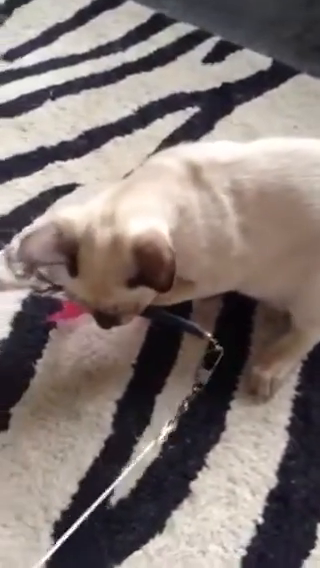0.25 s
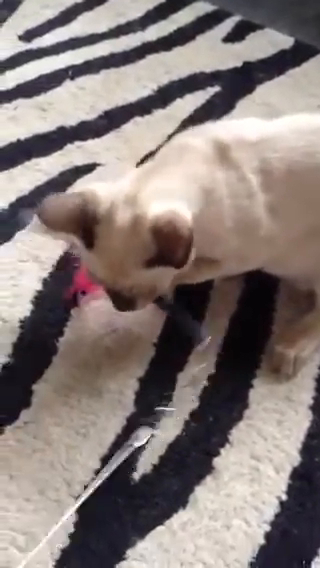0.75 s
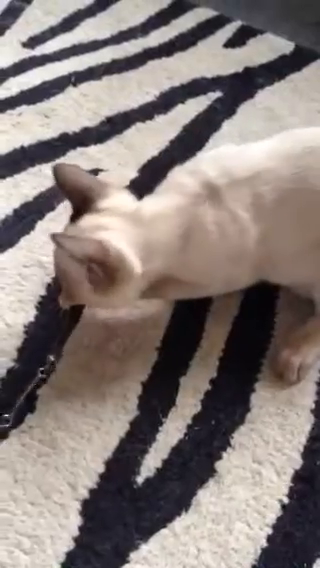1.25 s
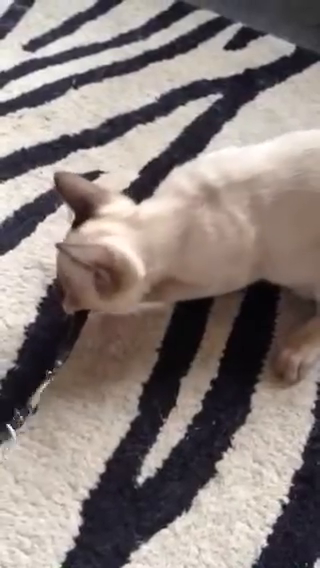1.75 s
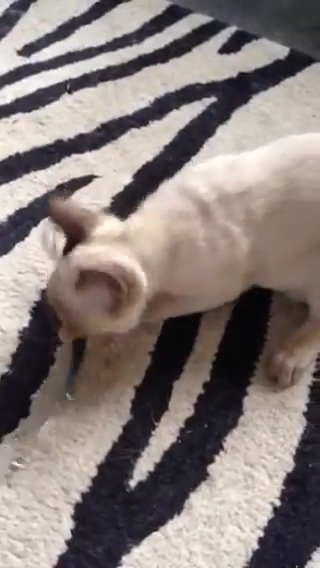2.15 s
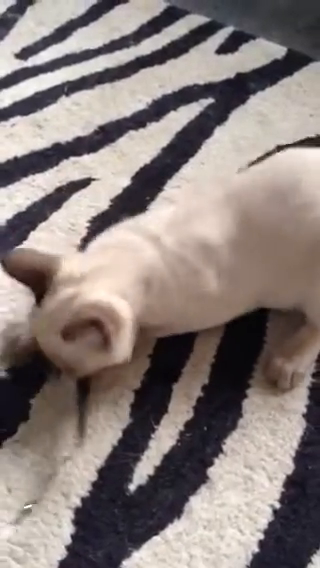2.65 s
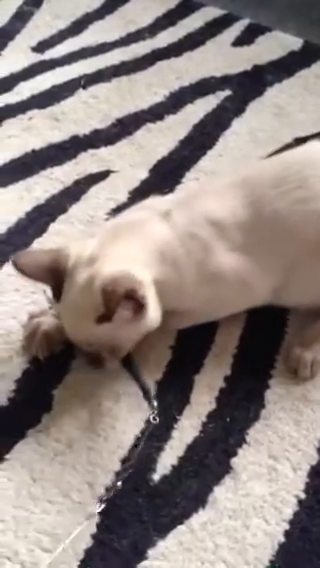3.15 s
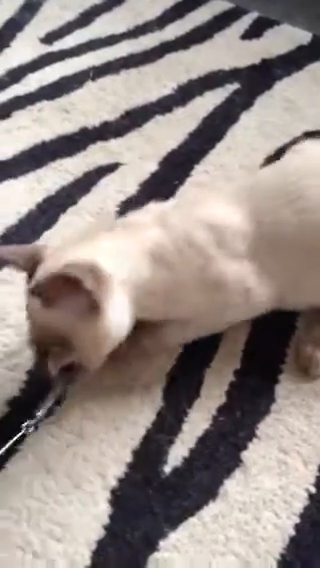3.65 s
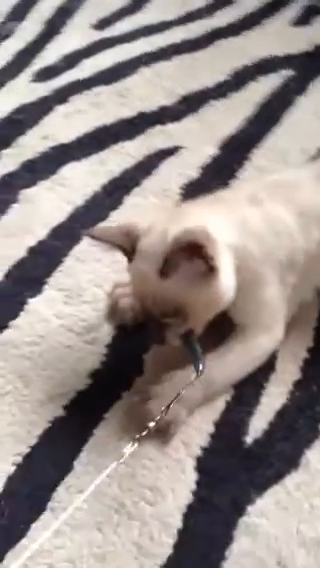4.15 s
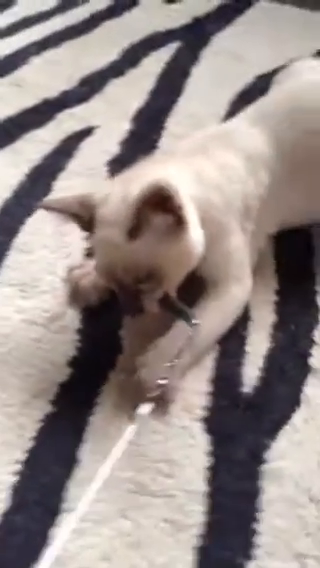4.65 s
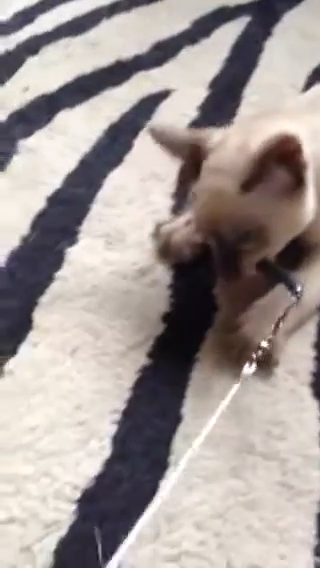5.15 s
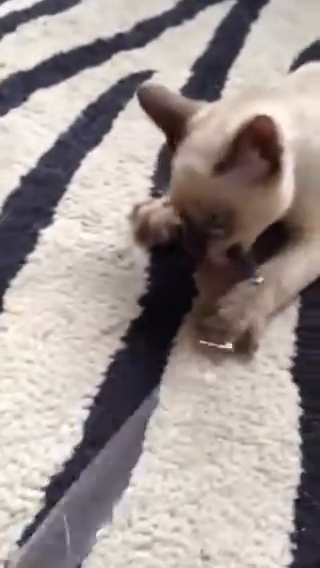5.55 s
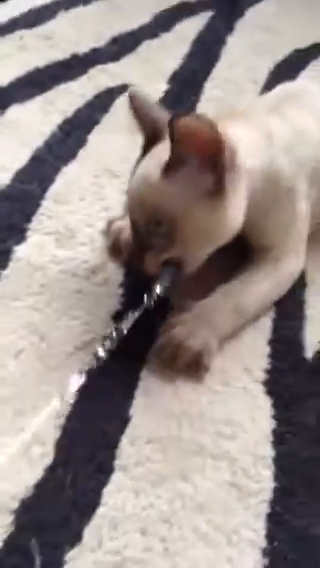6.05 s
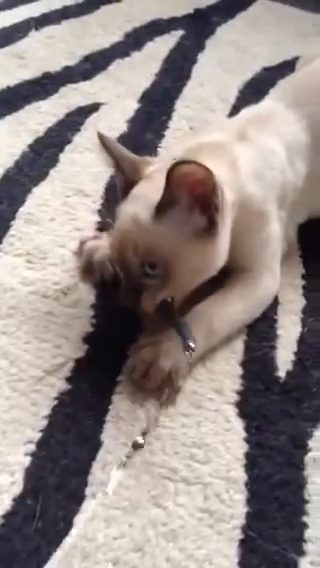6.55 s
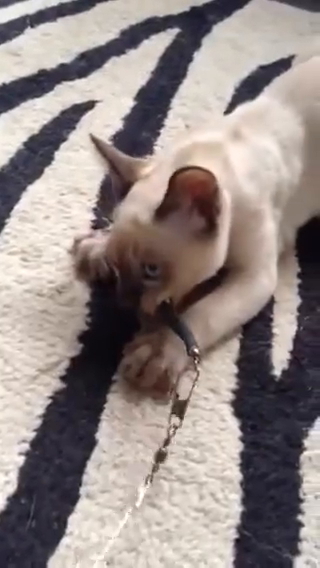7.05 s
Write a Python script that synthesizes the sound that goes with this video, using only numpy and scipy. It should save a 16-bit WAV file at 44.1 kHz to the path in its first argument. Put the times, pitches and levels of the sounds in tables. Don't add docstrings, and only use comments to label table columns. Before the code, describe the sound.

A kitten is already growling at 0 seconds, close to the phone in a soft, carpeted room: a low, closed-mouth drone with a rapid rough flutter, swelling in small pushes. Around 0.9 a tight cluster of tiny metallic ticks comes with a very short feather scuff. The growl lifts at about 1.0, then sinks and thins, with isolated clicks near 1.3, 1.8, 2.0 and 2.15, faltering and ending around 2.6. At 2.8 wet jaws part in sharp quick pops with a short airy gasp. A louder, strained growl begins at 3.0, peaking in pitch near 3.7 with a sharp click and faint high nasal whistle. It surges again around 4.15, grates on with leaking air, then weakens and drops away by 6.6, with ticks near 6.2 and a duller one at 6.6. Only hiss, soft handling rumble and a distant low drone remain until 7.3.

```python
import sys
import numpy as np
from scipy import signal
from scipy.fft import rfft, irfft, next_fast_len
from scipy.io import wavfile
from scipy.ndimage import uniform_filter1d, map_coordinates

SR = 44100
rng = np.random.default_rng(int(sys.argv[2]) if len(sys.argv) > 2 else 0)


def dump(signal):
    limited = np.clip(np.atleast_2d(signal).T, -1, 1)
    pcm = np.round(limited * 32767).astype(np.int16)
    wavfile.write(sys.argv[1], SR, pcm)


def gain_from_db(level_db):
    decades = np.asarray(level_db, float) / 20
    return 10 ** decades


N = 322812
T = np.arange(N) / SR

# time [s], fold pitch [Hz], flutter rate [Hz],
# fundamental level [dB], mouth opening [dB], throat rasp level [dB].
GROWLS = [
    [(0.0, 191.6, 64, -41.5, 1.5, -82), (.13, 172, 61.8, -41.5, -1.5, -82), (.34, 162, 60.1, -44.5, 0, -81),
     (.73, 151, 60.4, -47, -1, -81), (1.15, 160, 59.2, -47, -1, -85), (1.42, 146, 58.6, -53, -4, -83),
     (1.92, 146, 58.2, -55.5, -5, -84), (2.42, 154, 58.2, -55, .2, -81), (2.61, 135.5, 59, -60, -4, -82)],
    [(3.015, 145, 65.5, -50, -4, -86), (3.16, 169, 64.2, -42.5, 4, -70), (3.54, 176, 61.5, -42, 3, -68),
     (4.03, 186.4, 62.8, -42.5, 5, -71), (4.72, 182.3, 58.3, -43.5, 5, -68.5),
     (5.29, 161, 57.2, -47, 4, -78), (5.96, 163.4, 56.8, -48.5, 4, -73), (6.23, 160.3, 57, -51, 2, -79),
     (6.6, 133, 39, -62, -1.5, -80)],
]


def unit(x):
    return x / np.sqrt(np.mean(x ** 2) + 1e-20)


def levelled(x):
    return x / np.sqrt(np.abs(uniform_filter1d(x ** 2, size=4096)) + 1e-12)


def along(points, hz):
    f, v = np.transpose(points)
    return np.interp(np.log(hz + 1), np.log(f + 1), v)


def curves(*tables):
    s, *cols = np.transpose(np.concatenate(tables))
    return [np.interp(T, s, c) for c in cols]


def sounding(tables, fade=0.014):
    on = np.zeros(N)
    for rows in tables:
        start, end = rows[0][0], rows[-1][0]
        on += np.clip(np.minimum(T - start + fade, end + fade - T) / fade, 0, 1)
    return on


def tent(s, rise, fall):
    return np.interp(T, [s - rise, s, s + fall], [0, 1, 0])


def wobble(rate):
    return map_coordinates(rng.standard_normal(int(N * rate / SR) + 4), [T * rate])


def filtered(x, response):
    m = next_fast_len(N + SR // 2)
    return irfft(rfft(x, m) * response(np.fft.rfftfreq(m, 1 / SR)), m)[:N]


def resonance(f, hz, width_hz):
    return 1j * f * width_hz / (hz * hz - f * f + 1j * f * width_hz)


def noise(response):
    return unit(filtered(rng.standard_normal(N), response))


def effort():
    # peak [s], pitch lift [Hz], strain [dB], rise [s], fall [s].
    surges = [(.21, 13, 2, .08, .13), (.41, 12, .1, .07, .32), (1.035, 39, 7, .15, .1),
              (1.22, 7, .8, .07, .08), (1.34, 13, .1, .04, .08), (1.51, 7, .1, .09, .3),
              (2.06, 9, .8, .14, .12), (2.28, 25, 4, .09, .11), (3.3, 10, 2.5, .14, .08),
              (3.45, 5, 2.2, .07, .09), (3.71, 51, 12, .15, .11), (3.86, 18, .2, .12, .17),
              (4.15, 35, 3.5, .1, .57), (4.29, 12, 3.5, .14, .2), (5.02, 8, .8, .3, .27),
              (5.4, 4, -1.5, .1, .05), (5.64, 10, 3, .1, .34), (5.81, 16, 1.5, .1, .15),
              (6.17, 10, .8, .12, .06)]
    # time [s], level change [dB].
    catches = [
        (2.18, -3),
        (2.48, -12),
        (3.61, -7),
        (6.47, -5),
    ]
    pitch_hz, flutter_hz, first_db, open_db, rasp_db = curves(*GROWLS)
    lift, strain = sum(np.outer([hz, db], tent(s, rise, fall)) for s, hz, db, rise, fall in surges)
    first_db = first_db + 0.245 * lift
    first_db = first_db + sum(db * tent(s, .03, .03) for s, db in catches)

    edges = tent(GROWLS[1][0][0], .06, .06)
    edges = edges + sum(tent(rows[-1][0], .04, .04) for rows in GROWLS)
    silence_db = -25 * edges

    depth_db = np.minimum(-9 - .85 * (first_db + 45) + .45 * open_db, -1.1)
    jaw_db = -5 + 1.25 * open_db - .15 * lift
    return (pitch_hz + lift, flutter_hz + .1 * lift, first_db + silence_db, depth_db,
            open_db + strain + silence_db, jaw_db, rasp_db + 1.6 * strain)


def growl(pitch_hz, flutter_hz, first_db, depth_db, open_db, jaw_db):
    # frequency [Hz], gain [dB].
    throat = [(200, 19.5), (290, 6.5), (360, 2.5), (430, -.5), (500, -6), (590, -1.8), (680, -4.5),
              (780, -5.5), (900, -14.5), (1080, -31), (1300, -40), (1700, -58), (2800, -120)]
    fold = 2 * np.pi * np.cumsum(pitch_hz * (1 + 0.00953 * wobble(30))) / SR
    beat = np.exp(2j * np.pi * np.cumsum(flutter_hz * (1 + .055 * wobble(22))) / SR)
    depth = gain_from_db(depth_db + 1.2 * wobble(25))
    shimmer = gain_from_db(1.1 * wobble(150))
    shaky = fold + .11 * wobble(120) + .12 * wobble(35)

    sides = 1 + depth * beat + 0.33 * (depth * beat) ** 2 + 0.027 * np.conj(beat)
    cycle = np.exp(1j * ((fold + shaky) / 2 + .6))
    tone = np.sqrt(2) * shimmer * np.real(cycle * sides)

    over = np.zeros(N)
    for m in range(2, 11):
        pull = np.tanh(2.6 * m * depth)
        swing = pull * (1.3 / m * beat.real + 1j * min(.4 * m, 1.4) * beat.imag)
        over += np.real(np.exp(1j * (m * shaky + 0.84) + swing))

    puff = np.exp(0.37 * np.cos(fold - .4) + 0.14 * depth * beat.real)
    puffed = unit(puff * rng.standard_normal(N))
    breath = filtered(puffed, lambda f: 1 / (1 + (400 / (f + 1)) ** 3))
    over = unit(over) * shimmer + 2.1 * breath
    over = levelled(filtered(over, lambda f: gain_from_db(along(throat, f))))
    bright = filtered(over, lambda f: 1 / (1 + (770 / (f + 1)) ** 12))
    over += (gain_from_db(jaw_db + 1.5 * wobble(12)) - 1) * bright

    on = sounding(GROWLS)
    over_gain = gain_from_db(-53.5 + open_db + .7 * wobble(15))
    voice = on * (gain_from_db(first_db) * tone + over_gain * over)
    return filtered(voice, lambda f: 1 / (1 + (118 / (f + 1)) ** 8)), 1 + on * (puff - 1)


def rasp(puff, rasp_db):
    # frequency [Hz], gain [dB].
    rasp_colour = [(800, -29), (1000, -2.5), (1150, -0.5), (1300, -0.5), (1450, -6), (1600, -12.5),
                   (2000, -18), (2600, -52)]
    # resonance [Hz], width [Hz].
    teeth = [(1450, 620), (1700, 500), (2100, 192)]
    # start [s], end [s], level [dB].
    leaks = [(.7, .93, -84), (1.1, 2.2, -86), (2.23, 2.6, -74), (2.88, 3.0, -77), (3.15, 6.57, -79),
             (3.6, 3.78, -71), (6.08, 6.3, -79), (6.8, 7.0, -77)]
    air = filtered(puff * rng.standard_normal(N), lambda f: gain_from_db(along(rasp_colour, f)))
    throat_air = sounding(GROWLS) * gain_from_db(rasp_db + wobble(30)) * levelled(air)
    leak = noise(lambda f: sum(resonance(f, hz, w) ** 2 for hz, w in teeth))
    flow = sum(gain_from_db(db) * sounding([[(start,), (end,)]], fade=.03) for start, end, db in leaks)
    return throat_air + flow * gain_from_db(wobble(30)) * leak


def background():
    # frequency [Hz], gain [dB].
    hiss_colour = [(15, -45), (25, -13.5), (81, -11.5), (125, -14), (203, 7), (288, -6), (843, -15),
                   (1100, -19), (1200, -20), (1690, -18), (2280, -17), (3900, -14), (15300, -18.5)]
    # time [s], level [dB], length [s].
    shifts = [(.85, -78, .2), (2.0, -76, .12), (3.75, -68, .12), (4.4, -72, .08), (5.5, -69, .3),
              (5.93, -64, .15), (6.38, -70, .12), (6.75, -71, .2)]
    # time [s], level [dB].
    drone_course = [(0, -70), (3, -82), (6.6, -70.5), (7.32, -78)]
    hiss = gain_from_db(-66 + 0.1 * wobble(2.71)) * noise(lambda f: gain_from_db(along(hiss_colour, f)))

    rumble = noise(lambda f: resonance(f, 75, 70) ** 2) * gain_from_db(1.5 * wobble(9))
    rumble *= gain_from_db(-79) + sum(gain_from_db(db) * np.exp(-((T - s) / length_s) ** 2) for s, db, length_s in shifts)

    drone_db = curves(drone_course)[0] + 2.5 * wobble(10)
    drone = noise(lambda f: resonance(f, 192, 45) ** 2) * gain_from_db(drone_db)
    return hiss + rumble + drone


def ticks():
    # time [s], peak level [dB], ring [Hz], crack level [dB].
    tick_events = [(.868, -57, 5000, 10), (.88, -54, 4500, -6), (.894, -50, 8500, 6), (.935, -45, 2520, 8),
                   (.936, -47, 3770, 9), (.949, -46, 1980, 0), (.952, -57, 4000, 8.5), (.964, -53, 5540, 0),
                   (.972, -52, 3580, -6), (1.293, -46, 4100, -6), (1.7985, -44, 3760, -2),
                   (1.799, -47, 2200, -12), (1.8075, -47, 3900, -3), (1.808, -48, 2200, -9),
                   (1.971, -52, 4120, -8), (2.152, -48.5, 2520, 4), (2.576, -45, 1800, 3),
                   (2.654, -50, 1102, -12), (3.633, -54, 4000, 17), (3.6525, -40, 5554, 8),
                   (3.654, -38, 1870, 0), (6.056, -52, 2300, -6), (6.244, -47, 4200, 0),
                   (6.246, -49, 2900, -12), (6.576, -45, 1500, -12), (6.577, -54, 2200, -14),
                   (6.578, -44, 700, -20)]
    out, t = np.zeros(N), np.arange(SR // 20) / SR
    shape = gain_from_db(-60 * t / .0055) * (1 - np.exp(-t / 0.00033))
    for s, db, hz, crack_db in tick_events:
        crack = rng.standard_normal(len(t))
        ring = np.sin(2 * np.pi * hz * t) + .5 * gain_from_db(crack_db) * crack
        out[round(s * SR):][:len(t)] += gain_from_db(db - 0.5) * shape * ring
    return filtered(out, lambda f: resonance(f, 2100, 6000))


def rustle(rush, colour):
    s, db, rise, hold_s, fall = rush
    grains = rng.standard_normal(N) * gain_from_db(3.5 * wobble(300))
    air = unit(filtered(grains, lambda f: gain_from_db(along(colour, f))))
    before = np.maximum(s - T, 0)
    after = np.maximum(T - s - hold_s, 0)
    fall_db = np.maximum(-fall * after, -13 - 100 * after)
    return gain_from_db(db - rise * before + fall_db) * air


def feather_scuff():
    scuff = (.935, -54, 5000, .004, 600)
    # frequency [Hz], gain [dB].
    scuff_colour = [(500, -30), (1000, 0), (2400, -2), (4000, -4), (7000, -10), (14000, -18)]
    return rustle(scuff, scuff_colour)


def gasp():
    breath_in = (2.8, -56, 200, .03, 450)
    # frequency [Hz], gain [dB].
    gasp_colour = [(240, -35), (400, -13), (608, 3), (702, -22), (821, -16), (882, -25), (994, 2),
                   (2060, 5), (7000, -10.5), (9100, -47), (15400, -120)]
    return rustle(breath_in, gasp_colour)


def smack():
    # time [s], peak level [dB], thump relative to it [dB], brightness [Hz].
    partings = [(2.8019, -27, -5, 1930), (2.808, -28, 0, 3000), (2.8118, -38, 9.5, 2500),
                (2.8132, -21, -1, 6000), (2.8206, -34.5, 7, 3500), (2.826, -53, -14, 4500)]
    # resonance [Hz], width [Hz], gain [dB].
    cavity = [(550, 136, 1), (1330, 490, 3.5), (1670, 480, 5), (3330, 780, -7.5), (5150, 620, -9.5)]
    pops, thumps, t = np.zeros(N), np.zeros(N), np.arange(-64, 64) / SR
    for s, db, thump_db, bright_hz in partings:
        push = np.exp(-.5 * (2 * np.pi * bright_hz * t / 0.95) ** 2)
        pops[round(s * SR) - 64:][:len(t)] -= gain_from_db(db + 22) * push / push.sum()
        thumps[round(s * SR)] = -gain_from_db(db + thump_db + 36.5)

    def mouth(f):
        return sum((-1) ** k * gain_from_db(db) * resonance(f, hz, w) for k, (hz, w, db) in enumerate(cavity))

    return filtered(pops, mouth), filtered(thumps, lambda f: resonance(f, 280, 140) * resonance(f, 190, 470))


def whistle(puff, first_db):
    # time [s], whistle pitch [Hz].
    nose = [(3.64, 5840), (3.68, 5870), (3.79, 6110), (4.4, 6100), (4.46, 5980), (5.1, 5850), (5.6, 5650),
            (6.4, 6100)]
    hz, = curves(nose)
    db = -72.5 + 1.2 * (first_db + 35)
    fuzz = noise(lambda f: 1 / (1 + (f / 170) ** 2)) * np.sqrt(puff)
    return sounding([nose]) * gain_from_db(db + wobble(25)) * fuzz * np.sin(2 * np.pi * np.cumsum(hz) / SR)


def room(x):
    # frequency [Hz], time to fall 60 dB [s].
    decay = [(150, 0.37), (1500, 0.16), (5000, 0.033)]
    hz, t, z = signal.stft(rng.standard_normal(SR // 2), SR, nperseg=256)
    tail = signal.istft(z * gain_from_db(-60 * t / along(decay, hz)[:, None]), SR, nperseg=256)[1]
    late = np.pad(x, (260, 0))
    return signal.fftconvolve(late, tail / np.linalg.norm(tail))[:N]


def scene():
    *controls, rasp_db = effort()
    voice, puff = growl(*controls)
    pops, thumps = smack()
    hits = pops + ticks()
    near = voice + rasp(puff, rasp_db) + whistle(puff, first_db=controls[2])
    near = near + gasp() + feather_scuff() + hits + thumps
    echo = gain_from_db(-10.5) * room(hits) + gain_from_db(-23) * room(voice + thumps)
    return (near + echo + background())[None]


def low_pass(x):
    return signal.sosfilt(signal.butter(12, 15480, fs=SR, output="sos"), x)


def record(dry):
    mix = filtered(dry[0], lambda f: f < 15480)[None]
    return low_pass(mix)


dry = scene()
out = record(dry)
dump(out)
```